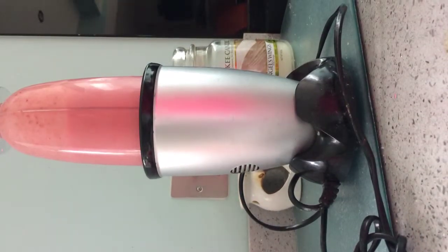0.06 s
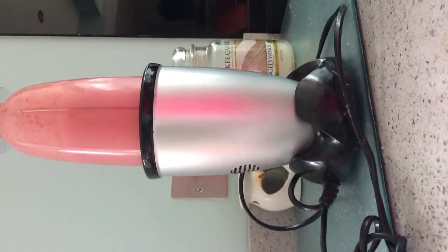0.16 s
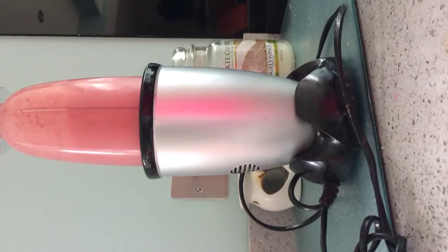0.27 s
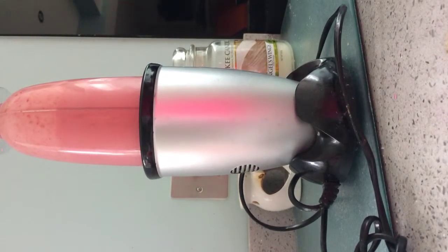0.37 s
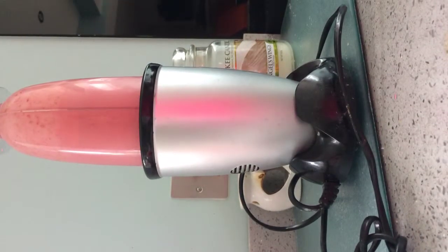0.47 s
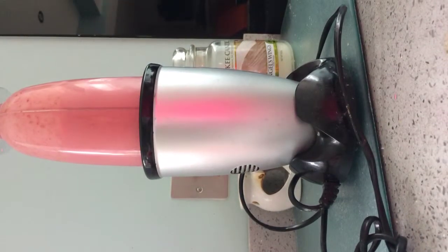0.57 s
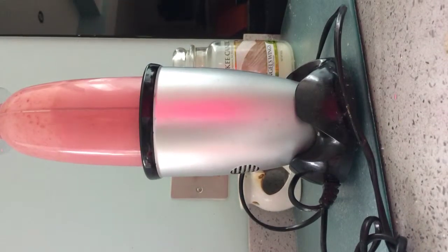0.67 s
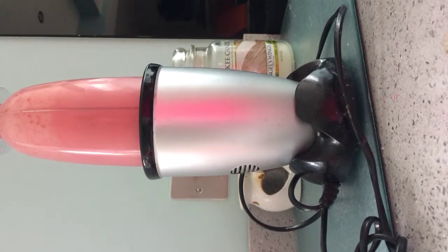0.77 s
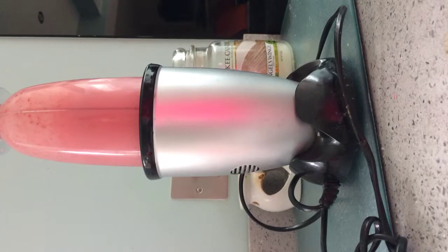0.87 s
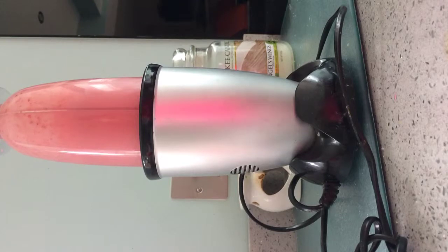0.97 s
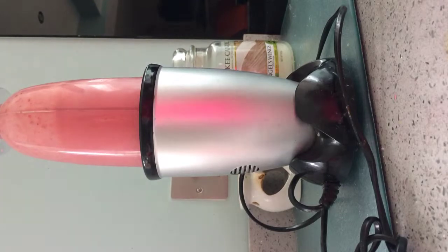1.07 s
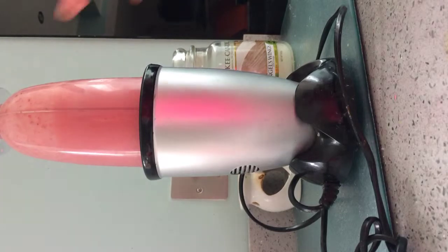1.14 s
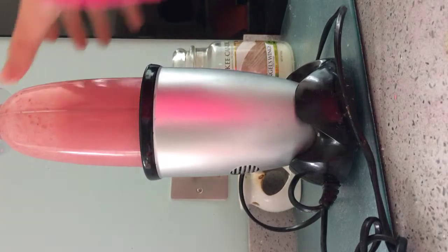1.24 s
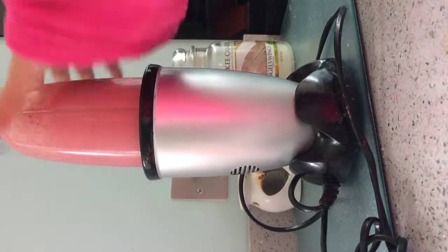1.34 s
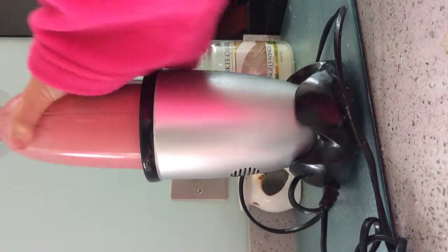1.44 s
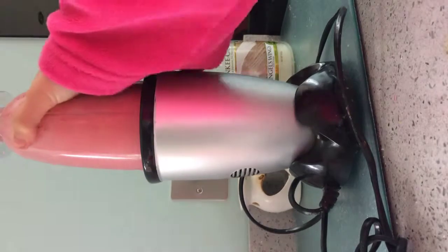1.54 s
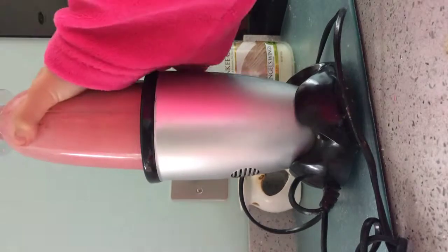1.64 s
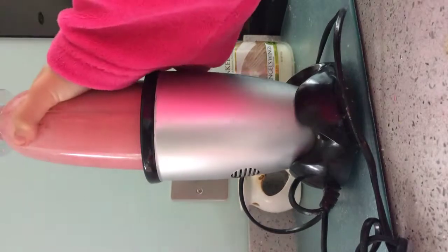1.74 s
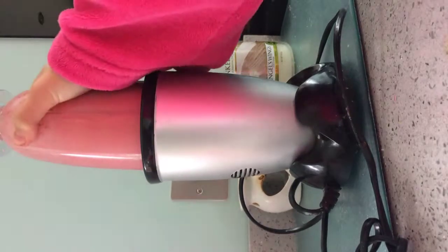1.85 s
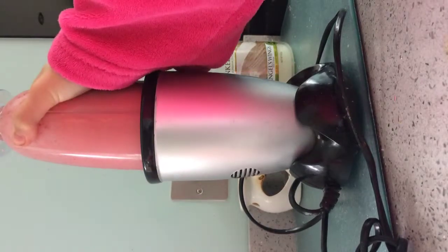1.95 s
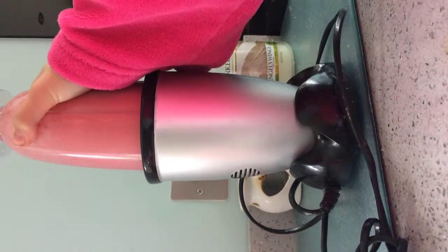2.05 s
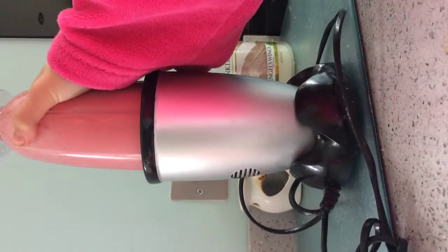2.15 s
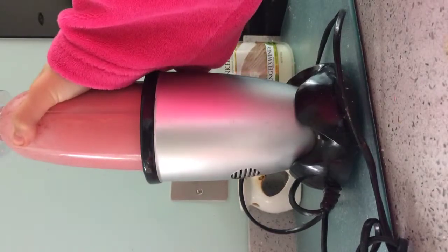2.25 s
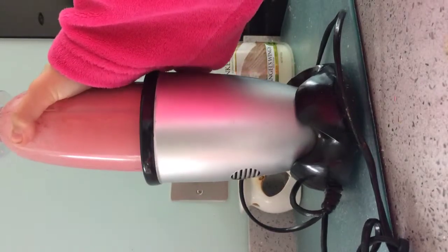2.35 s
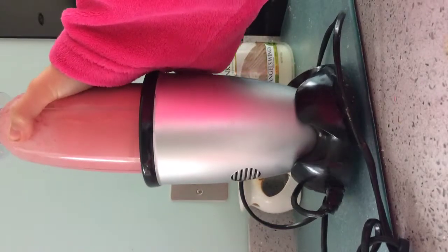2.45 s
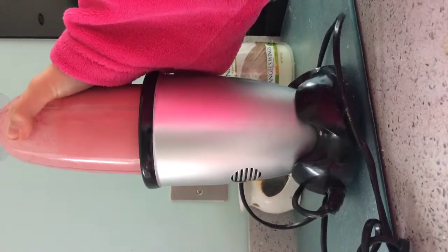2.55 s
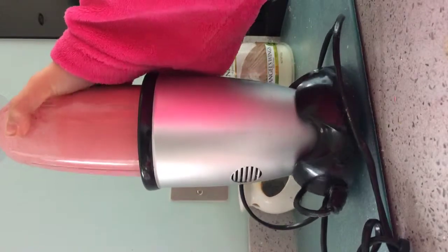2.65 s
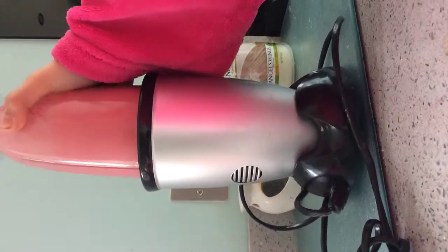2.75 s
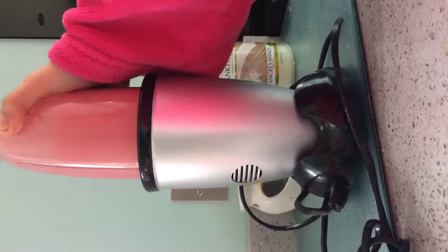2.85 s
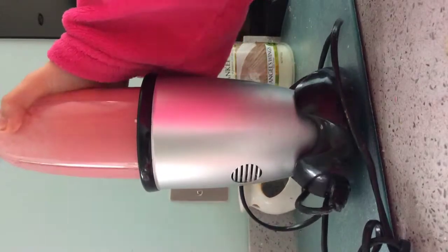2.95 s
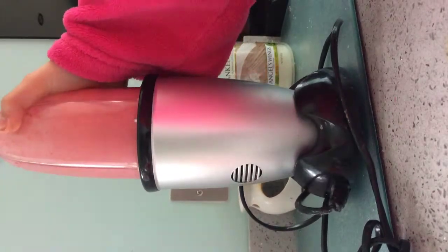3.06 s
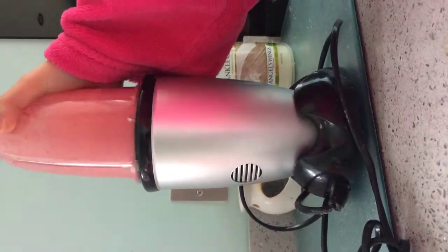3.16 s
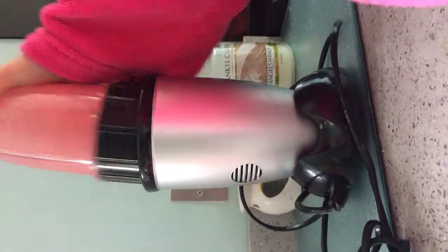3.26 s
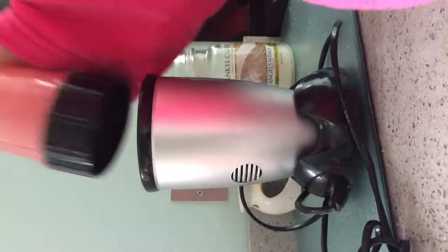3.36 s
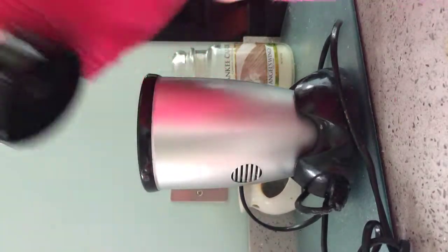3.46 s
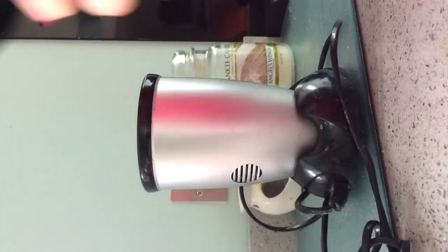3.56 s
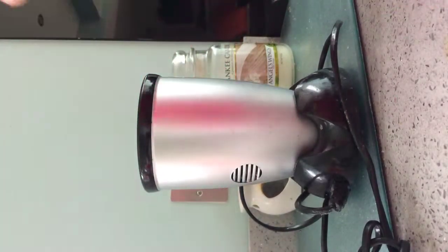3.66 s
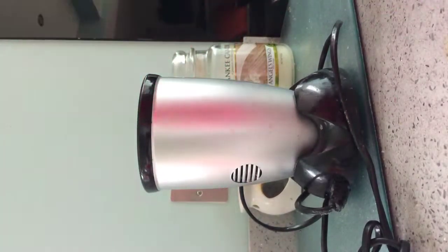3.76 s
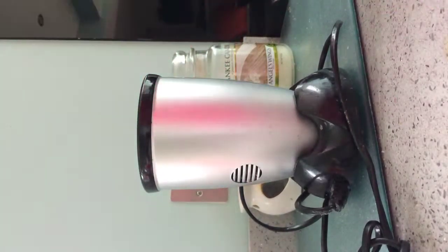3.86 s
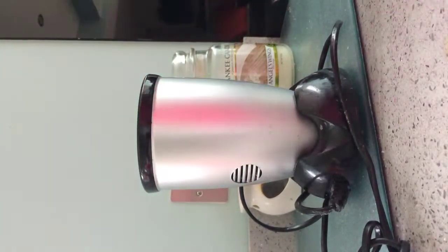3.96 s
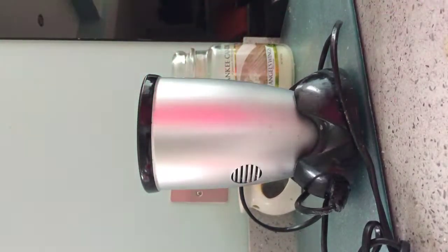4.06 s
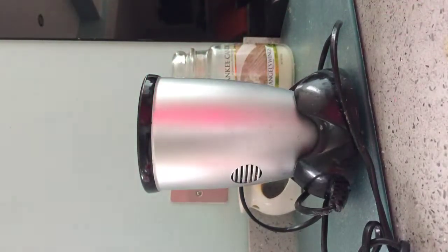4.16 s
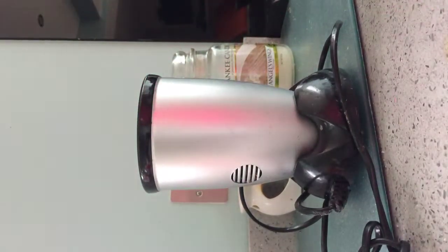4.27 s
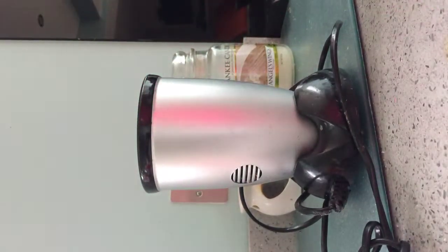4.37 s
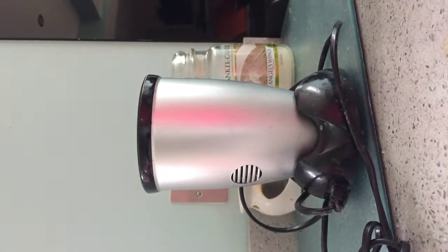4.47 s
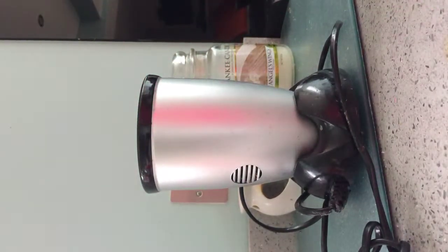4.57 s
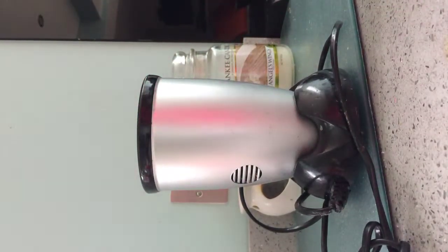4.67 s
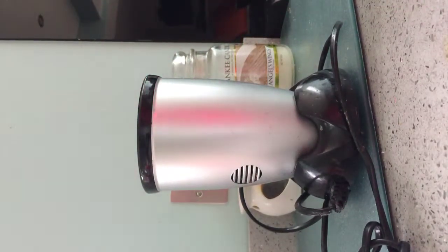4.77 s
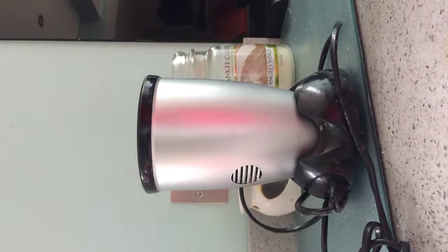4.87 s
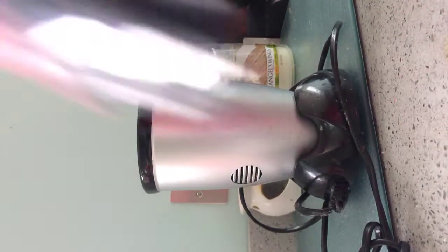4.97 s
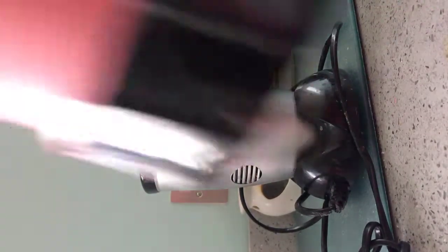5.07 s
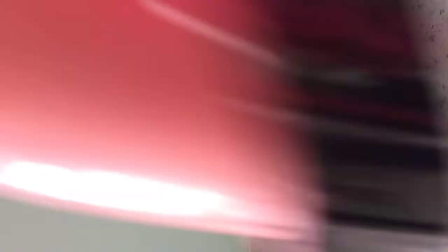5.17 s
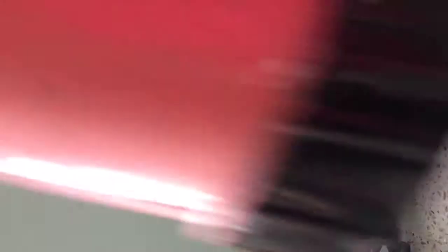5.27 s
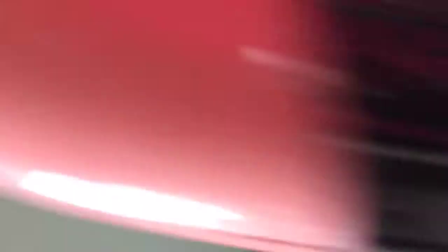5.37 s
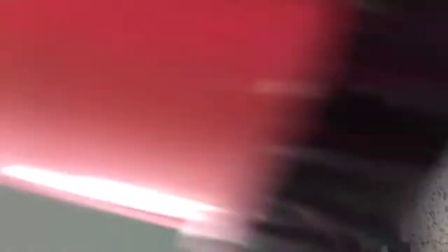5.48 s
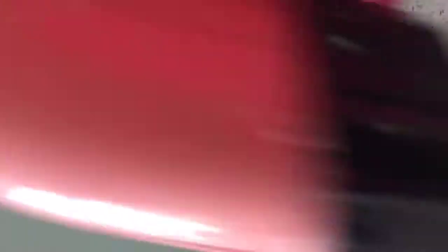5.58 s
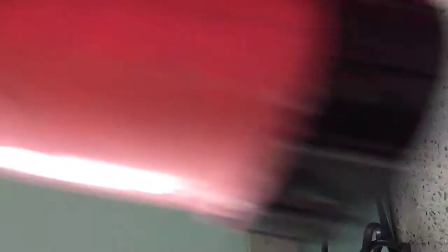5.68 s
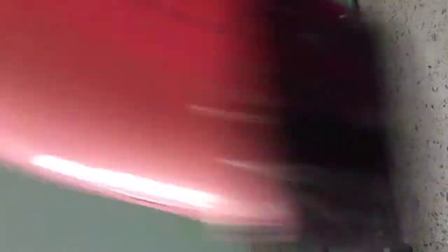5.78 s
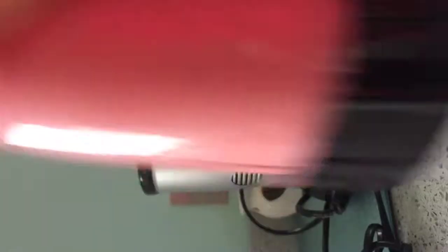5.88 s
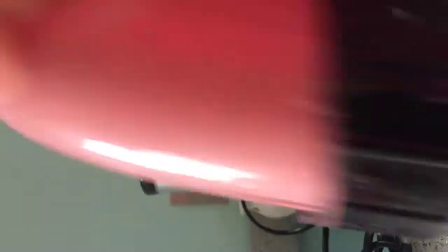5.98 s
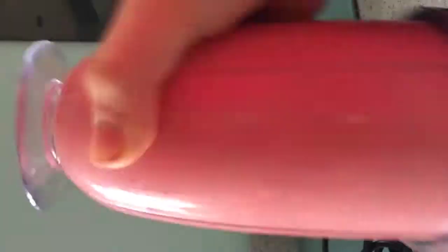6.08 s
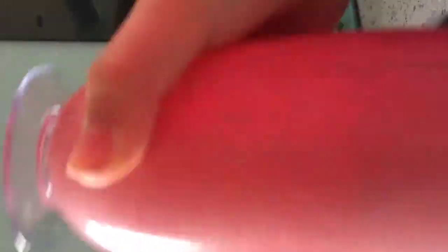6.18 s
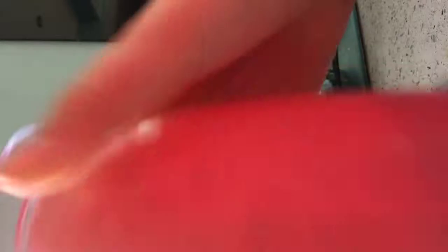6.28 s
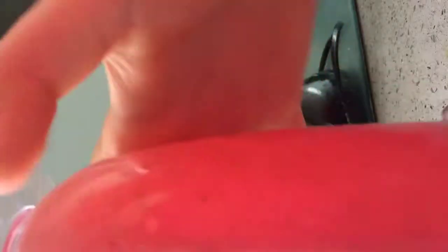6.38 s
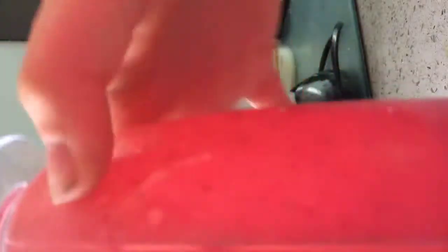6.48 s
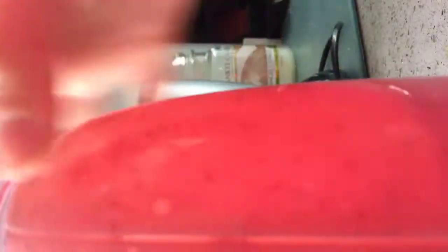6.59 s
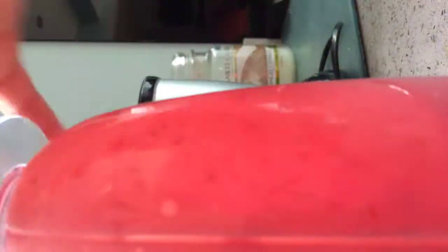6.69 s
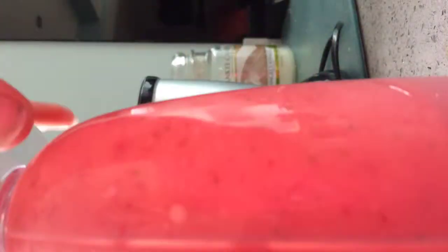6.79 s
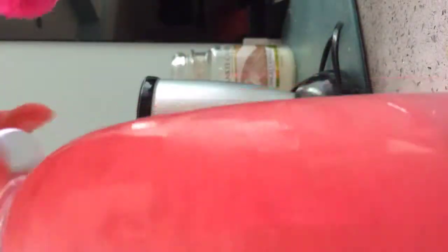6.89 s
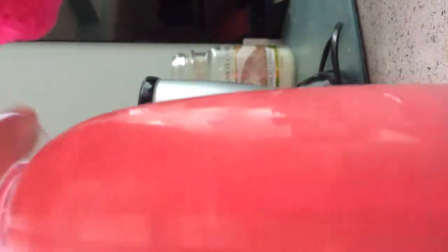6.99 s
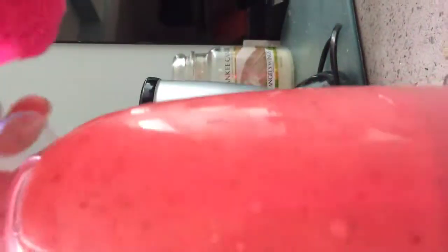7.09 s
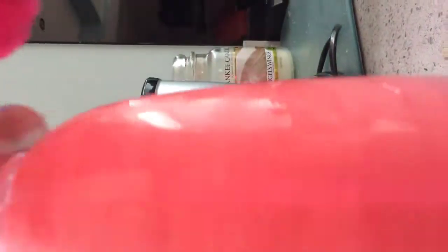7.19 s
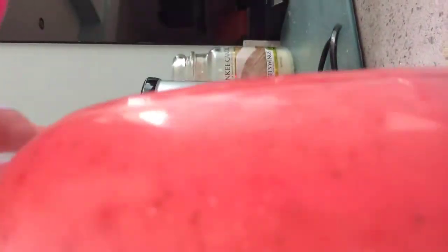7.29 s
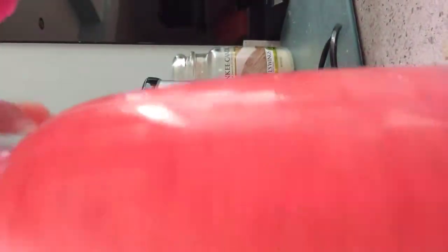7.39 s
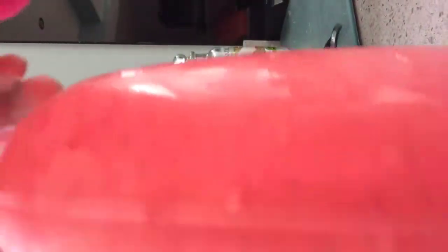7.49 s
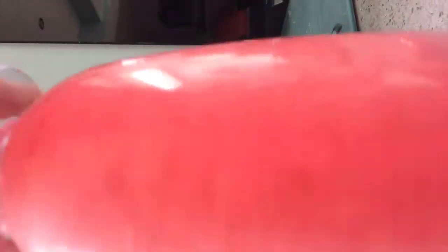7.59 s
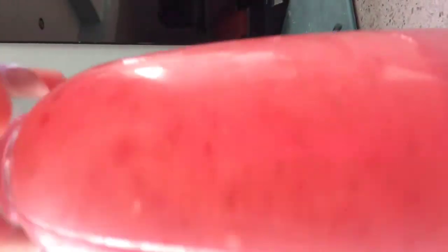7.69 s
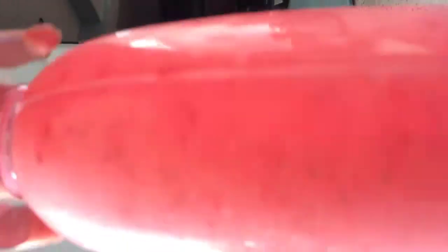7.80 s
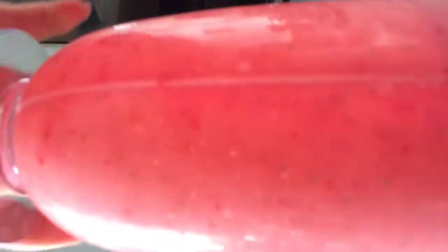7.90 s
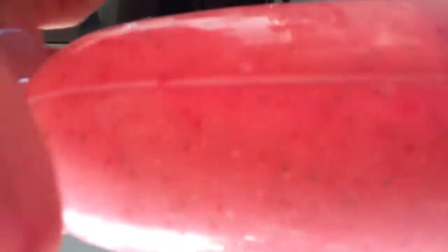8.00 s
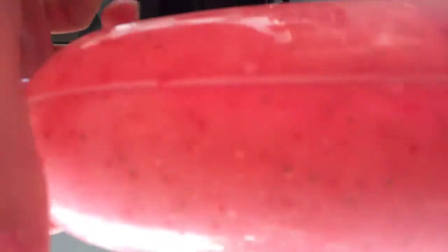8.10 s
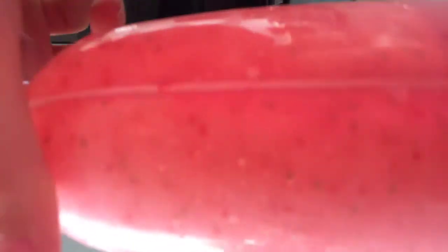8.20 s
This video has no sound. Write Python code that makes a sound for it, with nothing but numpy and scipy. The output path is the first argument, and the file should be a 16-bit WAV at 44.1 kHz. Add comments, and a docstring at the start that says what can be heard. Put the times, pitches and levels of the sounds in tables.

```python
"""Blender and plastic cup on a kitchen counter

A small blender churns a drink; a hand presses the cup, lifts it off, and the motor coasts to rest. The
cup is shaken close to a mono microphone, its thick drink slaps, it is set down, and fingers rub its wall.
One shaft angle drives the motor tones and paces the shaped-noise churn and fan hiss; struck modes make
the knocks and slaps, rising sines the bubbles, filtered grit the fingers; hits and bubbles wake the room."""
import sys
import numpy as np
from scipy import signal
from scipy.fft import rfft, irfft
from scipy.io import wavfile
from scipy.ndimage import uniform_filter1d

SR = 44100
rng = np.random.default_rng(int(sys.argv[2]) if len(sys.argv) > 2 else 0)


def level_to_linear(level):
    """Convert decibel levels to linear amplitude factors, elementwise."""
    exponent = np.asarray(level, float) / 20
    return 10 ** exponent


def master(y):
    """Save y as 16-bit WAV."""
    cut = np.clip(np.atleast_2d(y).T, -1, 1)
    pcm = np.round(cut * 32767)  # scale
    wavfile.write(sys.argv[1], SR, pcm.astype(np.int16))


N = 363379
T = np.arange(N) / SR
LEAD_S = .012  # room ahead of each knock or slap for its lead-in
REST_HZ = 22  # floor of the shaft speed; the motor tones have faded out above it

# resonances of the plastic cup: f/Hz, width/Hz, level/dB
CUP = [(161, 30, 1), (378, 36, 3.5), (510, 99, -6), (720, 120, -18.5), (1046, 320, -5), (1350, 180, -4),
       (2000, 140, -10), (2510, 290, -1), (2970, 860, 6), (4100, 600, -3), (5330, 900, -1), (7500, 3800, 2),
       (11100, 12000, -24.5)]


def evened(x):
    """Scales to rms 1."""
    return x / np.sqrt(np.mean(abs(x) ** 2) + 1e-20)


def read(points, hz):
    """Reads a spectrum on a log-frequency axis."""
    f, value = np.transpose(points)
    return np.interp(np.log(hz + 1), np.log(f + 1), value)


def curves(rows, t):
    """Columns of a table joined by straight lines, and a soft gate over its span."""
    s, *columns = np.transpose(rows)
    opening = np.clip((t - s[0]) * 50 + (s[0] == 0), 0, 1)
    closing = np.clip((s[-1] + .02 - t) * 50, 0, 1)
    return [np.interp(t, s, c) for c in columns] + [opening * closing]


def add(mix, s, sound):
    """Mixes a sound in at a time."""
    part = mix[round(s * SR):][:len(sound)]
    part += sound[:len(part)]


def humps(modes, hz):
    """Summed power of (Hz, width, dB) resonances."""
    return sum(level_to_linear(2 * db) / (1 + (2 * (hz - f) / w) ** 2) for f, w, db in modes)


def lifts(peaks, hz):
    """Summed dB of (Hz, width, dB) peaks and dips."""
    return sum(db / (1 + (2 * (hz - f) / w) ** 2) for f, w, db in peaks)


def coloured(x, colour_db, size=512):
    """Shapes x by a dB field, a function of frequency and time."""
    overlap = size * 3 // 4
    hz, t, z = signal.stft(x, SR, nperseg=size, noverlap=overlap)
    z = z * level_to_linear(colour_db(hz[:, None], t))
    return signal.istft(z, SR, nperseg=size, noverlap=overlap)[1][:N]


def patches(hz, t):
    """Random drifting blotches over frequency and time, rms 1."""
    field = rng.standard_normal((len(t), len(hz)))
    field = uniform_filter1d(field, size=12, axis=0)
    return evened(uniform_filter1d(field, size=6, axis=1)).T


def grit(per_s, spread_db, share, grain_s):
    """Noise roughened by short random bursts."""
    size = level_to_linear(spread_db * np.minimum(rng.exponential(1, N), 4)) * (rng.random(N) < per_s / SR)
    bursts = signal.lfilter([1], [1, -np.exp(-1 / (grain_s * SR))], size)
    return rng.standard_normal(N) * (1 + share * evened(bursts))


def filtered(x, hz, kind="low"):
    """Second-order low or high pass."""
    return signal.lfilter(*signal.butter(2, hz, kind, fs=SR), x)


def wander(hz):
    """Slow random drift: normal draws, hz of them a second, joined by straight lines."""
    steps = rng.standard_normal(int(N / SR * hz) + 2)
    return np.interp(T * hz, np.arange(len(steps)), steps)


def ring(hz, t60, size=4000):
    """One dying mode."""
    t = np.arange(size) / SR
    return np.sin(2 * np.pi * hz * t) * level_to_linear(-60 * t / t60)


def room_tone():
    """Steady quiet of the kitchen: noise with a fixed spectrum."""
    # f/Hz, relative level per Hz/dB
    quiet = [(18, -63.5), (30, -13.5), (184, -5.5), (215, -1.5), (273, -27), (295, -2), (384, -11),
             (426, -12.5), (16000, -43)]
    noise = coloured(rng.standard_normal(N), lambda hz, t: read(quiet, hz), size=2048)
    return level_to_linear(-61.5) * evened(noise)


def shaft():
    """Speed (turns a second) and angle: drag and bearings slow the rotor once the power is off."""
    # speed under power: t/s, turns per second
    powered = [(0, 195), (.7, 193.2), (1.3, 194.6), (1.55, 194.2), (1.7, 197), (1.84, 191.8), (2.9, 191.8)]
    off_s, drag_hz, drag_s = 2.872, 13.9, .1  # the drink's drag: total loss and time constant
    brake_hz_per_s = 65.3  # bearings brake evenly
    off = np.maximum(T - off_s, 0)
    hz = curves(powered, T)[0] - drag_hz * (1 - np.exp(-off / drag_s)) - brake_hz_per_s * off
    hz = uniform_filter1d(np.maximum(hz, REST_HZ), size=2000)  # a heavy rotor changes speed smoothly
    return hz, 2 * np.pi * np.cumsum(hz) / SR, off


def shake(angle):
    """Once-a-turn shake under load, choked for a moment as the hand grips."""
    # t/s, rms level/dB
    loaded = [(0, -37.5), (1.4, -36.5), (1.59, -46), (1.75, -32), (1.9, -38), (2.77, -34), (2.87, -44.5)]
    level_db, running = curves(loaded, T)
    level = level_to_linear(level_db + 1.5 * wander(12))
    return np.sqrt(2) * running * level * np.cos(angle + 0.34 * wander(25))


def churn(angle):
    """Pulp slaps the wall in bursts, lightly paced by the two blades; the grip changes the wall's colour."""
    # steady until the power is cut: t/s, level/dB
    churn_level = [(0, -17.5), (1.46, -17.5), (1.61, -18.5), (2.3, -18), (2.89, -18.5), (2.94, -25),
                   (3.0, -34.5), (3.11, -46.5), (3.25, -46.5), (3.45, -54)]
    # cup standing free, then pressed down: f/Hz, relative level per Hz/dB
    free = [(20, -46.5), (40, -49.5), (90, -24.5), (230, -21.5), (355, -20.5), (470, -2.5), (600, 0),
            (820, -7), (1040, -13.5), (1810, -19), (2800, -12), (3770, -14.5), (7000, -16), (11700, -25),
            (16000, -32.5)]
    held = [(20, -46), (40, -33), (90, -24.5), (230, -13), (340, -26), (430, -5.5), (600, -4.5), (700, -12),
            (990, -10.5), (1590, -15.5), (2300, -12.5), (3770, -13), (8300, -17), (11700, -26),
            (16000, -32)]
    # wall resonances fed by the churn: f/Hz, width/Hz, lift free/dB, lift held/dB
    wall = [(600, 150, 0, -1), (489, 90, 0.5, 6), (2394, 410, 3.5, 4), (3110, 72, 5.5, 0),
            (3240, 510, 8, 7.5), (2118, 68, 7.5, 4.5), (4200, 77, 5.5, 3), (5440, 330, 5.5, 5),
            (5780, 120, 4.5, 4.5), (7330, 370, 1, 1.5)]
    # hand on the cup: t/s, grip 0-1
    hand = [(0, 0), (1.46, 0), (1.52, 1), (3.3, 1)]
    # the cup rim buzzes while it is loose on the base: t/s, lift/dB
    loose = [(0, -0.5), (1.48, -3.5), (1.53, 8), (1.6, 0.5), (2.86, -4), (2.94, 6.5), (3.05, 9.5), (3.3, 2)]
    # the rim's resonance: f/Hz, width/Hz
    rim = (2300, 400)
    # blade beats under load: multiple of the shaft, level before a common 19 dB lift/dB
    pulp_orders = [(2, -48.5), (3, -33), (4, -39.5), (5, -41.5)]

    def colour_db(hz, t):
        grip = curves(hand, t)[0]
        wall_now = [(f, w, (1 - grip) * a + grip * b) for f, w, a, b in wall]
        rim_now = [(*rim, curves(loose, t)[0])]
        standing_db = (1 - grip) * read(free, hz) + grip * read(held, hz)
        return standing_db + lifts(wall_now, hz) + lifts(rim_now, hz) + 1.2 * patches(hz, t)

    level_db, gate = curves(churn_level, T)
    paced = 1 + .1 * np.cos(angle) + .08 * np.cos(2 * angle)
    lumps = filtered(grit(per_s=160, spread_db=0.5, share=0.39, grain_s=0.0026), 1400)
    spray = filtered(grit(per_s=450, spread_db=6.0, share=.2, grain_s=0.0012), 1400, "high")
    slosh = coloured((lumps + spray) * paced, colour_db)
    slosh /= np.std(slosh[:3 * SR])
    beats = sum(level_to_linear(db + 19 + 4.5 * wander(25)) * np.cos(k * angle + 0.2 * wander(30))
                for k, db in pulp_orders)
    surge_db = 0.13 * wander(9.43)  # the churn swells and sags at random
    return level_to_linear(level_db + surge_db) * gate * (slosh + beats)


def clink():
    """Metal touches the cup: three high modes die together."""
    # f/Hz, level/dB, t60/s
    clink_modes = [(10400, -34, 0.068), (11600, -29, .08), (15470, -25, .08)]
    return sum(level_to_linear(db) * ring(hz, t60) for hz, db, t60 in clink_modes)


def whine(hz, angle, off):
    """Coasting tones: multiples of the shaft slide through peaks and dips of the base."""
    # shake, its octave, six fins, commutator bars: multiple of the shaft
    tone_orders = (1, 2, 6, 24)
    # per tone: rms level at full speed before the base's lift/dB
    tone_db = [-58, -57, -47, -52]
    # per tone: loss per octave of slowing/dB
    tone_sag_db = [2.4, 24, 6, 4.7]
    # per tone, peaks and dips of the base: f/Hz, width/Hz, lift/dB
    tone_paths = [
        [(152, 14, -29), (139, 34, 26), (68, 16, 4.5), (45, 16, -20)],
        [(375, 40, 6), (268, 33, 19.5)],
        [(1030, 130, 9.5), (880, 70, 6.5), (478, 60, 11), (370, 100, -24.5)],
        [(4300, 400, -8), (3750, 200, 3), (3490, 130, 9), (3250, 110, 10), (3020, 170, -9), (2600, 130, 14.5),
         (1830, 350, -19), (1500, 340, 4.5), (950, 340, 2)],
    ]
    tones = np.zeros(N)
    for k, db, sag_db, path in zip(tone_orders, tone_db, tone_sag_db, tone_paths):
        level_db = db + sag_db * np.log2(hz / hz[0]) + lifts(path, k * hz) + 1.5 * wander(20)
        tones += level_to_linear(level_db) * np.cos(k * angle)
    coasting = np.clip(off * 50, 0, 1) * np.clip((hz - REST_HZ - 1) / 8, 0, 1)
    return np.sqrt(2) * coasting * tones


def contact(peak_db, hz, thud_db, tick_db, noises):
    """A short smear of noise, sharper when hard, rings the struck spot and the cup: spot, thud, tick."""
    spot_noise, tick_noise, spatter_noise, thud_noise = noises
    hz_axis = np.fft.rfftfreq(4096, 1 / SR)
    t = np.arange(4096) / SR - LEAD_S
    after = np.maximum(t, 0)
    cup = np.sqrt(humps(CUP, hz_axis)) / (1 + (110 / (hz_axis + 1)) ** 3)
    split = 1 / (1 + (hz_axis / 1500) ** 4)  # thud below, tick above
    shell = sum(level_to_linear(db) * ring(f, 5 / width) for f, width, db in CUP if f > 1500)
    hard = np.clip(1 + (peak_db + 3.5) / 9, 0, 1)
    t60 = .016 * (hz / 1000) ** -.4  # base time, scaled below; higher rings die sooner

    rise = np.clip(.0002 - .00002 * peak_db, .0001, .001)
    shape = (1 - np.exp(-after / rise)) ** 2 * level_to_linear(-60 * after / (.5 * t60))
    # after-contacts
    spatter = uniform_filter1d(abs(spatter_noise) ** 3 * (spatter_noise > 2.5), size=60)
    spatter *= level_to_linear(-60 * after / (4.3 * t60)) * (t > 0)
    # wet contacts creep in
    soft = np.clip(-peak_db / 12, 0, 1) * np.exp(np.minimum(t, 0) / 0.0025) * (t < 0)
    shape = abs(shape / shape.max() + spatter + 0.25 * soft)
    crack = 9 * hard * np.exp(-after / 0.000061) * (t >= 0)  # a hard blow starts with one sharp push

    # the spot has a second ring 1.1 times higher; hard contacts ring longer
    spot_ring = ring(hz, (1.2 + 0.44 * hard) * t60) + 0.32 * ring(1.1 * hz, 0.31 * t60)
    spot = np.diff(signal.oaconvolve(spot_noise * shape + crack, spot_ring), prepend=0)

    thud = irfft(rfft(thud_noise * shape ** .5) * cup * split)
    push_s = 0.0035  # a slow low push of the full cup lies under the thud
    thud += level_to_linear(-21) * abs(thud).max() * np.e * after / push_s * np.exp(-after / push_s)

    bright = level_to_linear(12 * hard * np.log2(1 + hz_axis / 4000))  # hard contacts have more treble
    tick = irfft(rfft(tick_noise * shape ** (0.77 + .7 * hard)) * cup * (1 - split) * bright)
    tick += .5 * signal.oaconvolve(np.diff(crack, prepend=0), shell)[:4096]
    tick += 3.2 * np.diff(crack, n=2, prepend=[0, 0])
    tick = filtered(tick, 10500)

    gains_db = (peak_db - 3.5, thud_db - 6.0, tick_db + 5)
    return [level_to_linear(db) * part / abs(part).max() for db, part in zip(gains_db, (spot, thud, tick))]


def knocks_and_slaps():
    """Knocks of the cup and wet slaps of the thick drink inside; each is followed by a weaker one."""
    # t/s, peak/dB, loudest ring/Hz, thud/dB, tick/dB (the three levels are trimmed in contact)
    cup_knocks_and_slaps = [(2.874, -11, 3400, -16, -11.5), (2.903, -12.5, 468, -28, -20),
                            (2.922, -9.5, 2380, -11.5, -17), (2.975, -12.5, 2300, -56, -15),
                            (3.385, -27, 1500, -23.5, -32), (4.359, -31, 476, -40, -56),
                            (4.396, -44, 471, -32, -57), (4.424, -37, 450, -53, -55),
                            (4.532, -30.5, 633, -48, -52), (4.912, -34, 1520, -45, -39),
                            (4.921, -17, 1350, -19, -36), (5.025, -41, 3600, -55, -40),
                            (5.049, -44, 784, -45, -38), (5.124, -11, 2170, -4.5, -16.5),
                            (5.137, -11.5, 2000, -17, -22), (5.247, -26, 1820, -70, -32.5),
                            (5.262, -28, 1980, -61, -38), (5.277, -30, 1810, -34.5, -33),
                            (5.345, -24.5, 1300, -33, -31.5), (5.354, -11.5, 765, -27, -28),
                            (5.38, -17, 2040, -17.5, -26.5), (5.421, -40, 1920, -70, -43),
                            (5.463, -18.5, 1940, -22.5, -35), (5.528, -25, 950, -44, -31.5),
                            (5.537, -21.5, 503, -15, -31.5), (5.571, -12, 1970, -13, -54),
                            (5.584, -25, 1690, -46, -47.5), (5.696, -32, 6300, -41, -43),
                            (5.727, -21, 1500, -19, -34), (5.737, -29, 380, -36, -35),
                            (5.743, -7.5, 392, -18, -29), (5.773, -23.5, 1960, -83, -45),
                            (5.785, -20.5, 1920, -50.5, -66.5), (5.808, -27, 1190, -51, -40),
                            (5.877, -33.5, 440, -48, -48), (5.939, -24, 1090, -32.5, -41.5),
                            (5.953, -20.5, 2110, -29.5, -32.5), (5.974, -13, 2010, -44, -41.5),
                            (5.986, -13, 377, -55.5, -35), (5.999, -1.3, 1320, -37, -27.5),
                            (6.049, -31, 1950, -54, -51.5), (6.078, -14, 1740, -57, -38),
                            (6.11, -27, 331, -26, -47.5), (6.166, -28.5, 1490, -33.5, -49),
                            (6.186, 0, 1160, -1.5, -7.5), (6.228, -7.5, 4270, -7, -14.5),
                            (6.232, 0, 958, -11.5, -23), (6.292, -2.7, 550, -3, -48),
                            (6.309, -8, 630, -59, -21), (6.322, -40, 587, -52, -27),
                            (6.354, -20, 522, -44, -38), (6.374, -22.5, 2870, -43, -33),
                            (6.395, -28, 506, -48, -42), (6.492, -22, 5330, -54, -37),
                            (6.809, -36, 2510, -71, -49), (6.833, -37, 2420, -56, -44),
                            (7.079, -48, 340, -40, -58), (7.245, -48, 340, -50, -56),
                            (7.982, -31.5, 2580, -61, -42.5), (8.012, -30, 2410, -76, -47),
                            (8.055, -41, 2450, -63, -55)]
    drop_db, top_db = -17.5, -34  # a follower's usual drop, and the loudest follower before trim
    waits_s = .016 + 0.0065 * rng.uniform(-1.1, 1, len(cup_knocks_and_slaps))
    followers = []
    for (s, peak_db, hz, thud_db, tick_db), wait in zip(cup_knocks_and_slaps, waits_s):
        fall_db = min(drop_db, top_db - peak_db)
        followers.append((s + wait, peak_db + fall_db, hz, thud_db + fall_db, tick_db + fall_db))
    out = np.zeros(N)
    draws = rng.standard_normal((2 * len(cup_knocks_and_slaps), 4, 4096))
    for (s, *hit), noises in zip(cup_knocks_and_slaps + followers, draws):
        for part in contact(*hit, noises):
            add(out, s - LEAD_S, part)
    return out


def coast(hz, angle):
    """Shaft multiples 1-110, and fan noise, light up as they slide through the housing's resonances."""
    # coasting motor: t/s, rms level of the treble/dB
    coast_level = [(2.95, -28), (3.01, -61), (3.11, -46), (3.75, -43), (3.94, -45.5), (4.4, -48.5),
                   (5.09, -46), (5.3, -55)]
    # fan and brushes: f/Hz, relative level per Hz/dB
    air = [(24, -36), (40, 15.5), (101, 3), (269, -6.5), (503, -1), (831, -1.5), (1020, -2), (1270, -10.5),
           (2630, -5), (2980, -14), (5720, -5), (12800, -6.5), (16000, -9)]
    # motor housing, compressed below: f/Hz, width/Hz, level/dB
    housing = [(496, 59, -3.5), (700, 71, -18), (1094, 86, 0), (1384, 86, -2), (1750, 56, -1),
               (1990, 79, -15.5), (2605, 53, 0), (3350, 54, -27), (3630, 130, 5.5), (4230, 25, 2),
               (4630, 38, 3.5), (5200, 57, 0.5), (5740, 120, -1), (6345, 180, -16), (6640, 150, -13.5),
               (7400, 130, -6.5), (8070, 260, -7), (9050, 250, -10.5), (11330, 210, -5.5),
               (12900, 340, -5.5)]
    # slots and commutator bars stand out: shaft multiple, level over 1 Hz of fan noise
    # before the housing's extra swell: fast/dB, slow/dB
    bar_rows = [(4, 24, 18), (5, 15, 25), (8, 20, 21), (12, 21, 29), (13, 27, 21), (20, 26, 27),
                (23, 28, 18), (31, 26, 24), (28, 27, 25), (32, 27, 26), (36, 33, 30), (40, 31, 26),
                (43, 30, 24), (48, 34, 32), (60, 33, 34), (72, 31, 30), (84, 31, 26)]
    plain_db, fast_hz, slow_hz, stall_hz = 23, 140, 88, 70  # other multiples; shaft speeds

    def body_db(f, speed_hz):
        slowing = np.maximum(1 - speed_hz / 95, 0)
        duller_db = 6 * slowing * np.log2(1 + f / 2000)  # duller as it slows
        return read(air, f) + 6 * np.log10(level_to_linear(-33.5) + humps(housing, f)) - duller_db

    level_db, gate = curves(coast_level, T)
    on = slice(int(2.9 * SR), int(5.35 * SR))
    fan = grit(per_s=420, spread_db=9, share=0.15, grain_s=.001) * (1 + 0.084 * np.cos(angle))
    sound = coloured(evened(fan), lambda f, t: body_db(f, np.interp(t, T, hz)))
    speed = hz[on][::64]  # line levels move in steps of 64 samples
    bars = {k: pair for k, *pair in bar_rows}
    for k, (phase, chance) in enumerate(rng.random((110, 2)), 1):
        line_hz = k * speed
        fast_db, slow_db = bars.get(k, [plain_db + 8 * (chance - .5) - 8 * (k < 22)] * 2)
        over_db = np.interp(speed, [slow_hz, fast_hz], [slow_db, fast_db]) + 10 * np.log10(4 / SR)
        # lines sink into the hiss near standstill, the slot tone (12) last
        over_db -= .7 * np.maximum(stall_hz - 14 * (k == 12) - speed, 0)
        # above 9 kHz the lines fade and only hiss gets out
        over_db -= .004 * np.maximum(line_hz - 9000, 0)
        # lines feel the housing's peaks more than the hiss does
        swell_db = 2.2 * np.log10(.05 + 3 * humps(housing, line_hz)) * (k > 20)
        line_db = over_db + body_db(line_hz, speed) + swell_db + 3 * wander(8)[on][::64]
        gain = np.repeat(level_to_linear(line_db), 64)[:len(hz[on])]
        sound[on] += gain * np.cos(k * angle[on] + 2 * np.pi * phase)
    treble = filtered(sound[on], 1500, "high")
    return level_to_linear(level_db) * gate * sound / np.std(treble)


def motor():
    """The shaft angle drives the shake, the whines, the churn and the coast."""
    hz, angle, off = shaft()
    return shake(angle) + whine(hz, angle, off) + churn(angle) + coast(hz, angle)


def skin():
    """Hiss of sliding fingers, the duller sound they draw from the cup, wet ticks as the drink sloshes."""
    # cup shaken in the hands, then slid onto the counter: t/s, ticks/dB, body/dB
    handling = [(4.85, -52, -72), (5.03, -59, -55), (5.5, -66, -68), (5.8, -70, -84), (5.91, -58, -63),
                (6.05, -69, -72), (6.2, -64.5, -55), (6.316, -47, -49), (6.44, -50, -58.5)]
    # finger hiss, then the cup's answer: f/Hz, relative level per Hz/dB
    skin_colour = [(880, -38), (1500, -12), (2020, -10), (3030, 5), (3520, -4), (4240, 4), (4970, 1.5),
                   (7100, 0), (8320, -2.5), (11000, -3), (16000, -10.5)]
    body_colour = [(24, -60), (40, -8.5), (96, 8.5), (156, -13.5), (372, 5), (791, -4.5), (1030, -0.5),
                   (1200, -4.5), (2200, -11.5), (2860, -22.5), (4840, -120)]
    smooth = grit(per_s=600, spread_db=3, share=.12, grain_s=.002)
    hiss = coloured(smooth, lambda hz, t: read(skin_colour, hz) + 1.6 * patches(hz, t))
    wet = grit(per_s=200, spread_db=12, share=.5, grain_s=0.0014)
    ticks = coloured(wet, lambda hz, t: 10 * np.log10(humps(CUP, hz)) - 20 * (hz < 900))
    rough = grit(per_s=80, spread_db=6, share=0.4, grain_s=0.004)
    body = coloured(rough, lambda hz, t: read(body_colour, hz), size=1024)
    ticks_db, body_db, gate = curves(handling, T)
    rub, drawn = strokes()
    body_gain = gate * level_to_linear(body_db) + drawn
    return gate * level_to_linear(ticks_db) * evened(ticks) + rub * evened(hiss) + body_gain * evened(body)


def strokes():
    """Hiss and body gains of the finger strokes: one arch each."""
    # strokes along the cup: start/s, length/s, hiss peak/dB, body peak/dB
    finger_strokes = [(6.424, 0.26, -45, -57), (6.93, 0.25, -39, -48), (7.231, .21, -43, -49.5),
                      (7.438, 0.17, -43, -50), (7.618, 0.15, -42, -46.5), (7.761, 0.21, -41.5, -52)]
    peak, ends_db, squareness = 0.58, -15.5, 2.45  # place of the peak 0-1; level at both ends
    gains = np.zeros((2, N))
    for s, length, *levels_db in finger_strokes:
        u = (T - s) / length
        from_peak = np.where(u < peak, 1 - u / peak, (u - peak) / (1 - peak))
        arch_db = ends_db * from_peak ** squareness
        gains += level_to_linear(np.array(levels_db)[:, None] + arch_db)
    return gains


def glugs():
    """Air in the drink: bubbles rise in pitch as they near the surface."""
    # t/s, start/Hz, end/Hz, length/s, level/dB
    bubbles = [(5.028, 149, 370, 0.018, -37), (5.504, 280, 800, 0.011, -37)]
    out = np.zeros(N)
    for s, start_hz, end_hz, length, db in bubbles:
        hz = np.geomspace(start_hz, end_hz, int(length * SR))
        add(out, s, level_to_linear(db) * np.sin(2 * np.pi * np.cumsum(hz) / SR) * np.hanning(len(hz)))
    return out


def kitchen(x):
    """Room reverberation: a noise tail whose bands die at their own speed."""
    # f/Hz, t60/s
    decay = [(150, 0.294), (600, 0.35), (2500, 0.19), (10000, 0.2)]
    noise = rng.standard_normal(SR // 2)
    tail = coloured(noise, lambda hz, t: -60 * t / read(decay, hz), size=256)
    tail[:200] = 0
    return signal.oaconvolve(x, tail / np.linalg.norm(tail))[:N]


def scene():
    """All sources on two equal channels; knocks, slaps, clink and bubbles wake the room."""
    hits = knocks_and_slaps() + glugs()
    add(hits, 1.498, clink())
    mono = motor() + hits + level_to_linear(-19.5) * kitchen(hits) + skin() + room_tone()
    return np.array([mono, mono])


def roll_off(x):
    """The treble ends steeply here."""
    return signal.sosfilt(signal.butter(12, 17040, fs=SR, output="sos"), x)


def record(dry):
    """The microphone drops deep bass and the top, then limits hard."""
    mic = filtered(dry, 45, "high")
    mic = signal.oaconvolve(mic, signal.firwin(255, 15750, fs=SR)[None], "same")
    return roll_off(np.clip(mic, -1, 1))


dry = scene()
out = record(dry)
master(out)
```